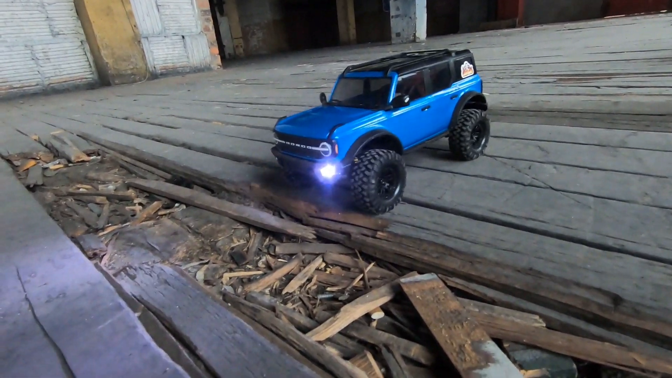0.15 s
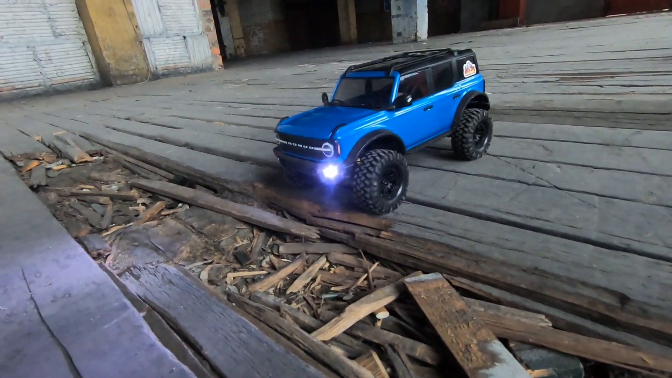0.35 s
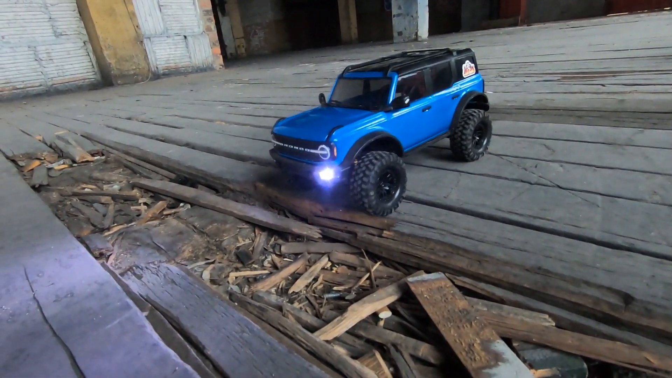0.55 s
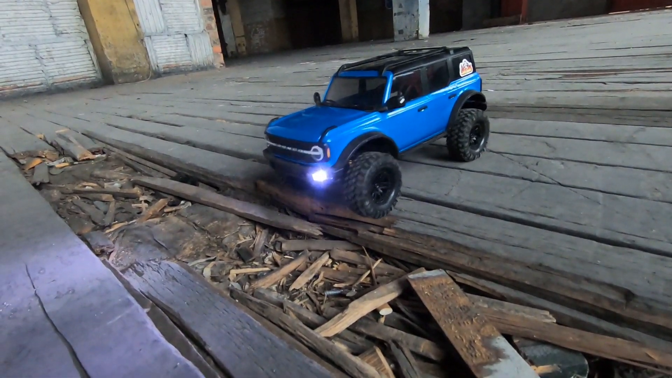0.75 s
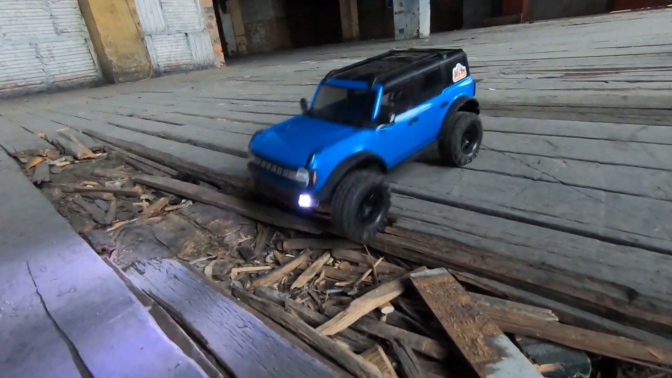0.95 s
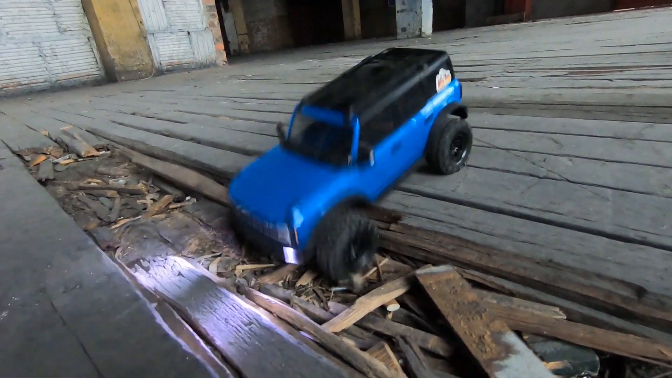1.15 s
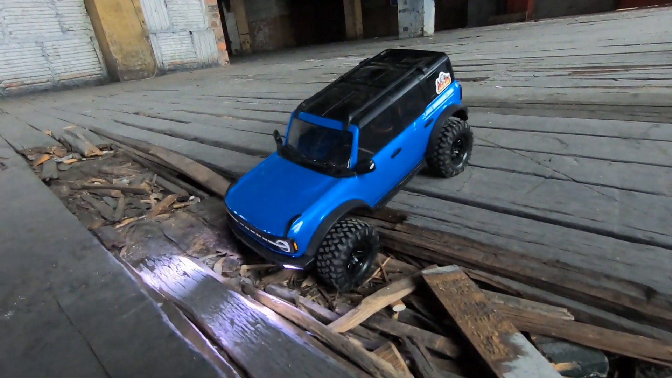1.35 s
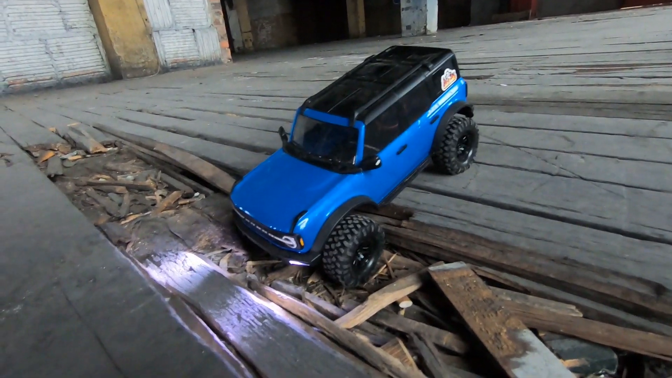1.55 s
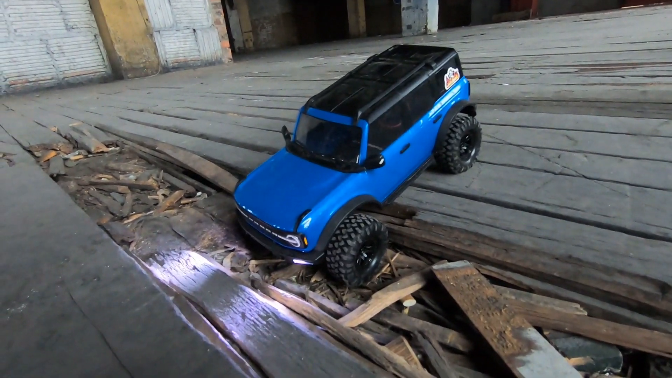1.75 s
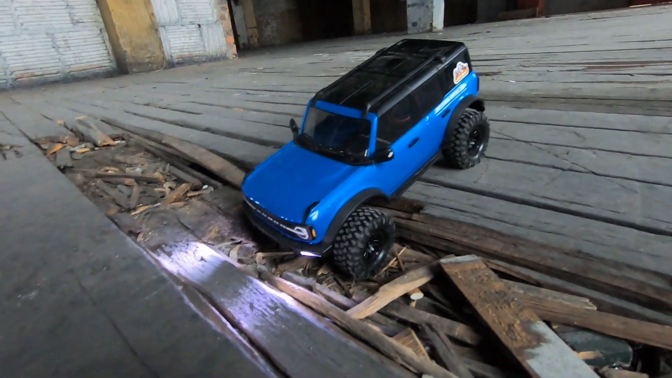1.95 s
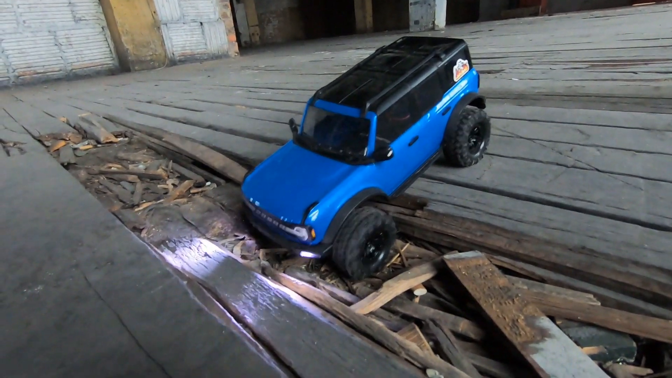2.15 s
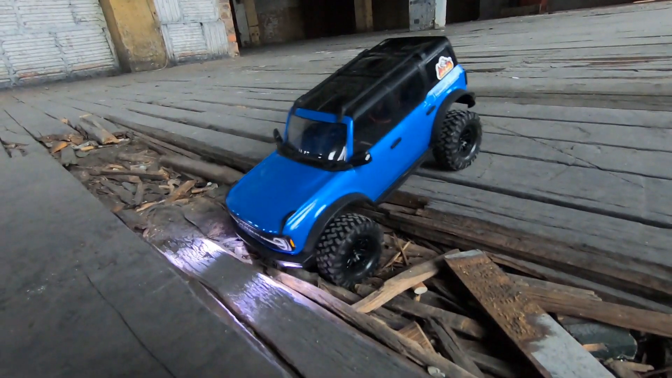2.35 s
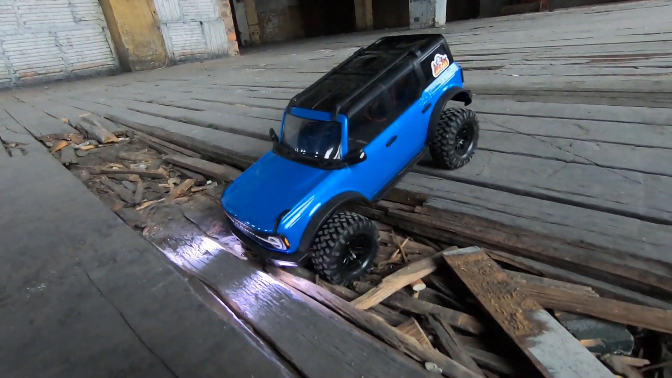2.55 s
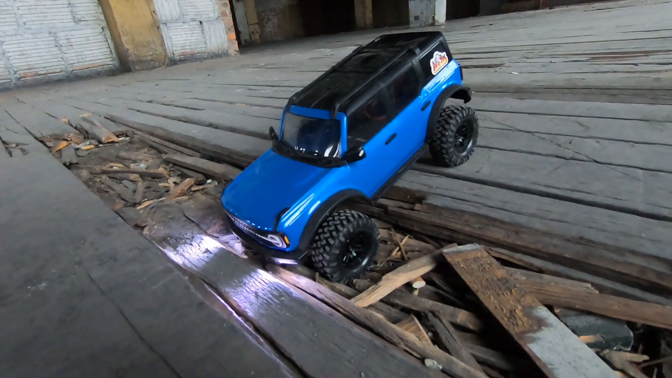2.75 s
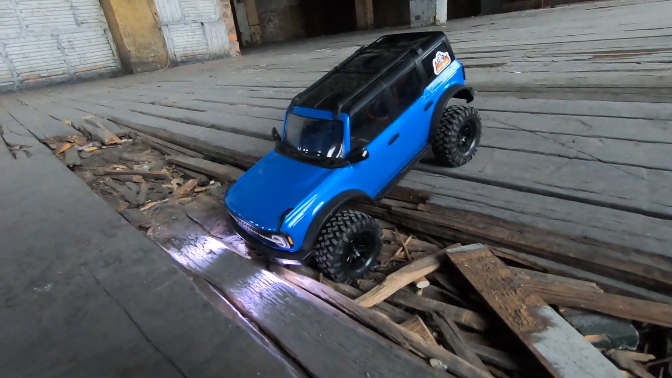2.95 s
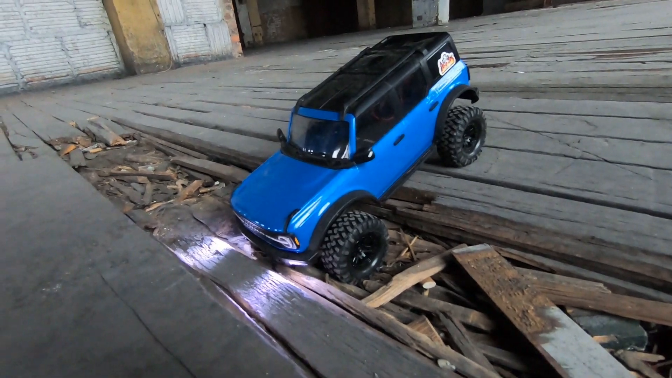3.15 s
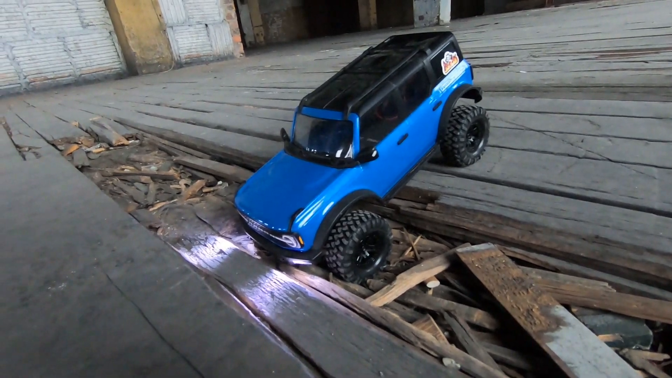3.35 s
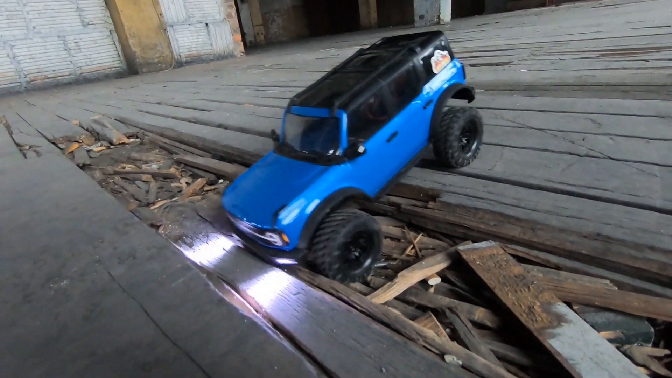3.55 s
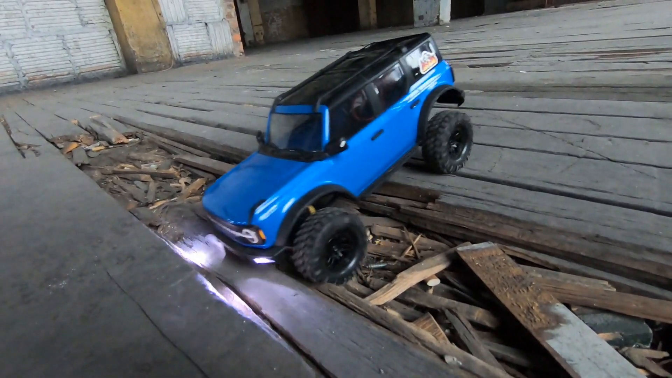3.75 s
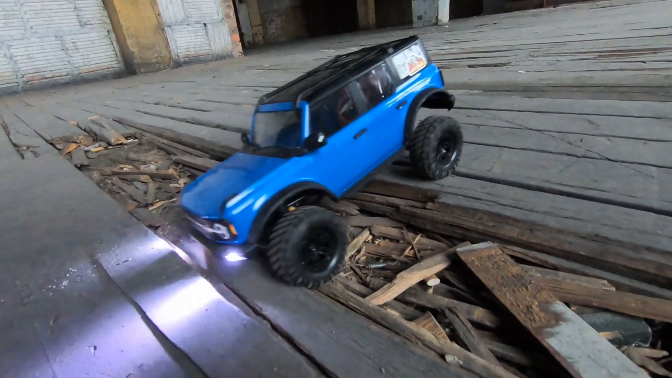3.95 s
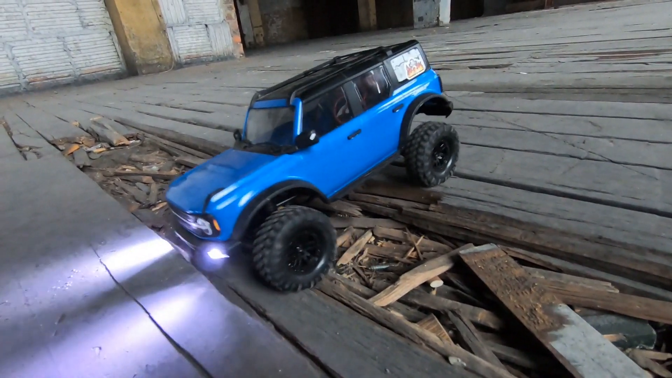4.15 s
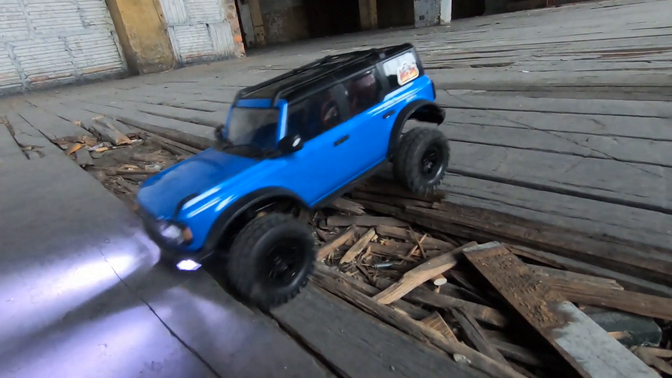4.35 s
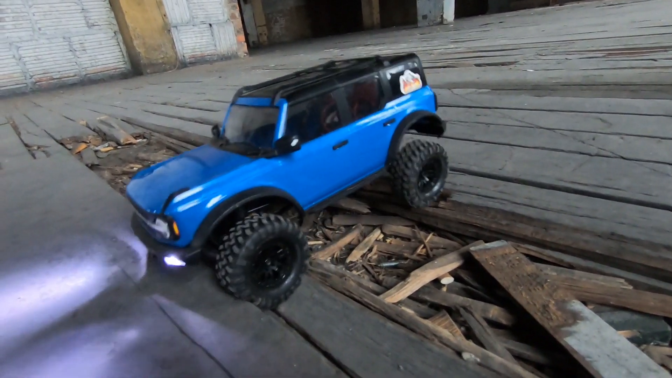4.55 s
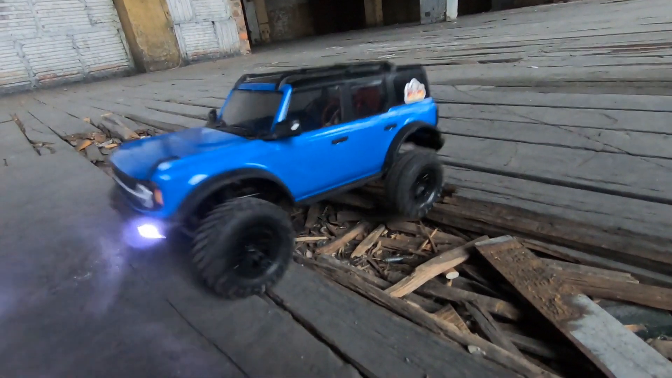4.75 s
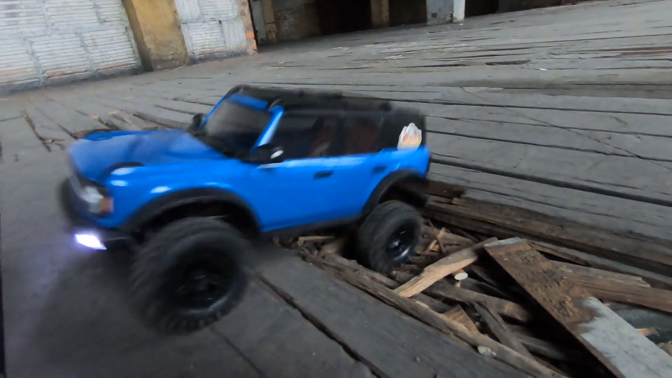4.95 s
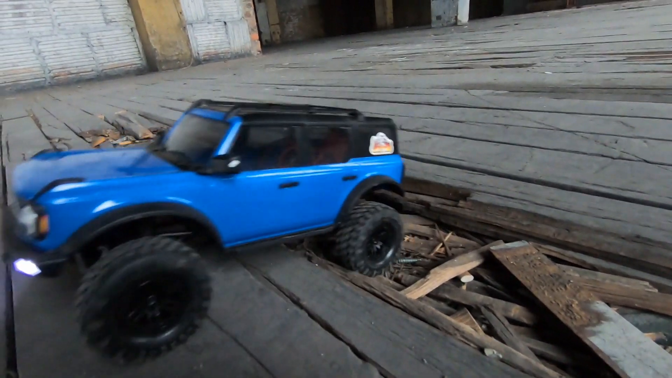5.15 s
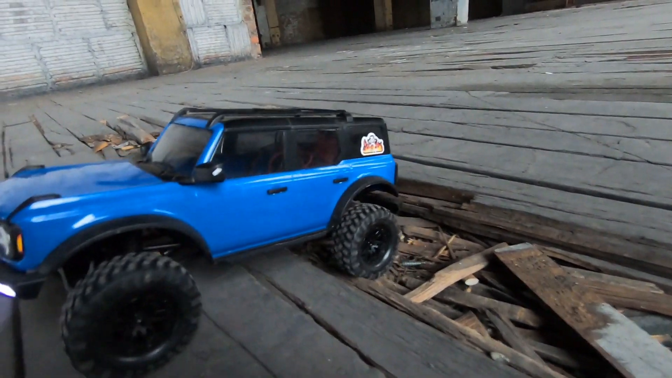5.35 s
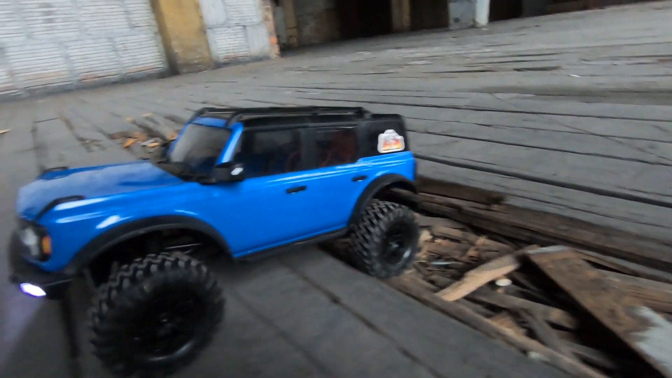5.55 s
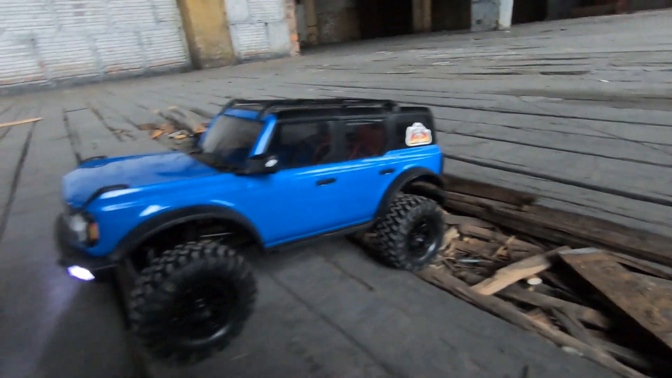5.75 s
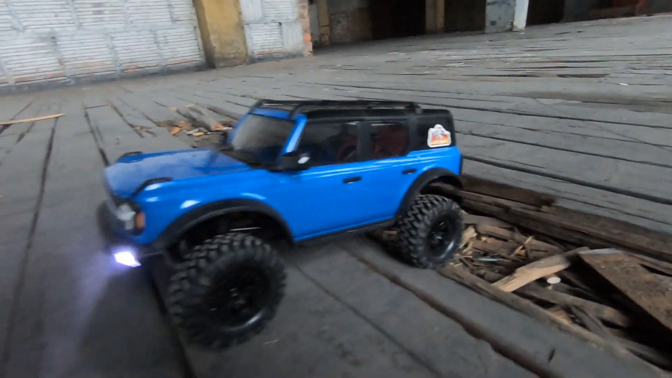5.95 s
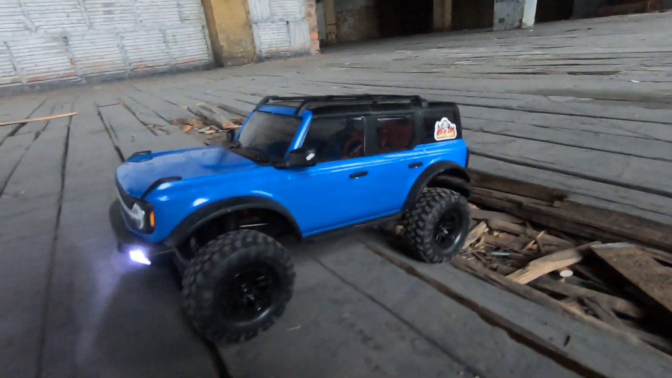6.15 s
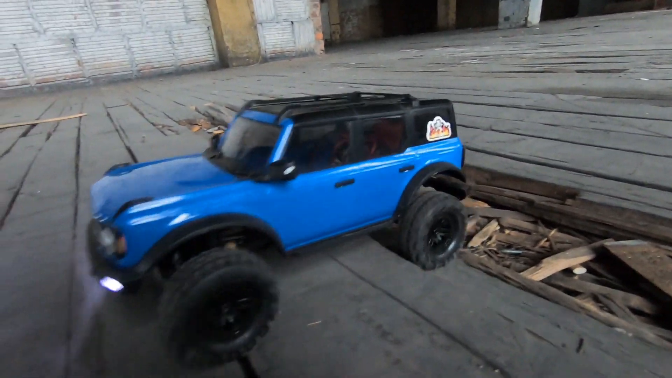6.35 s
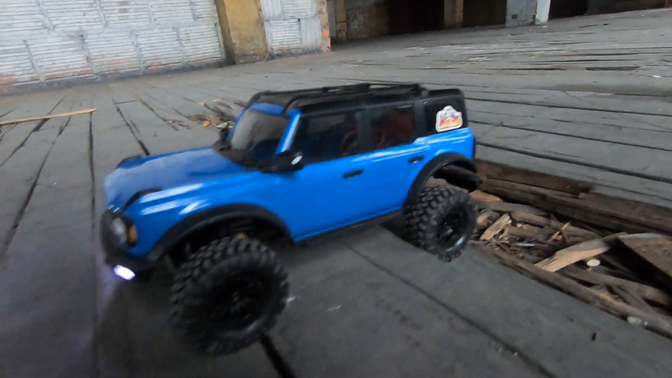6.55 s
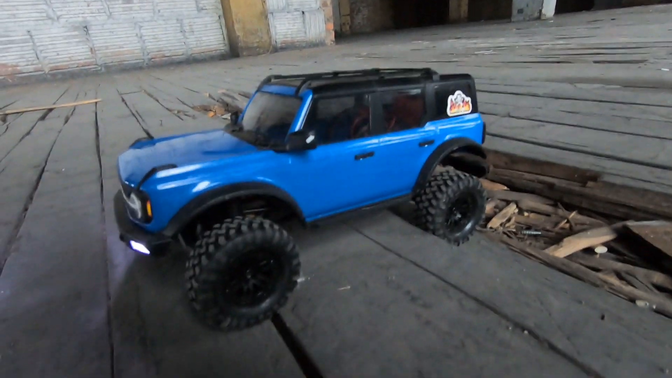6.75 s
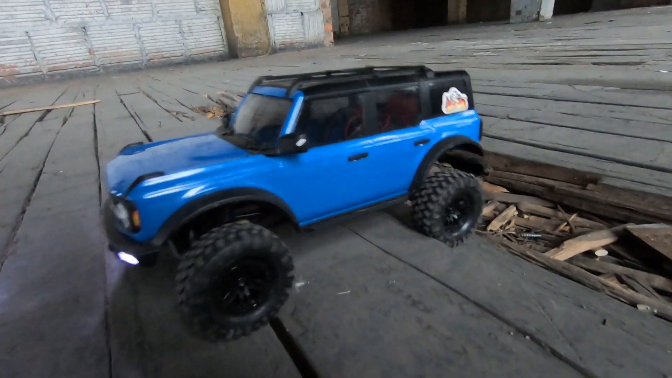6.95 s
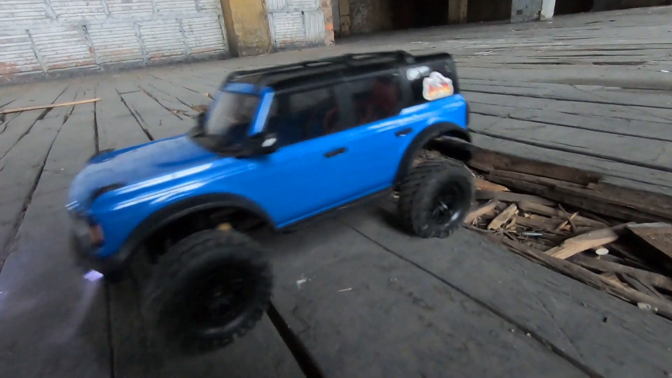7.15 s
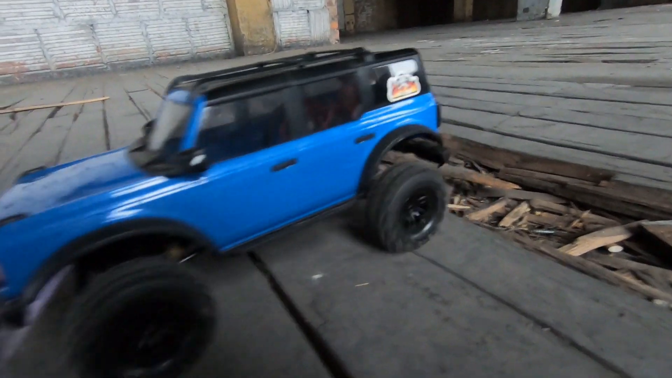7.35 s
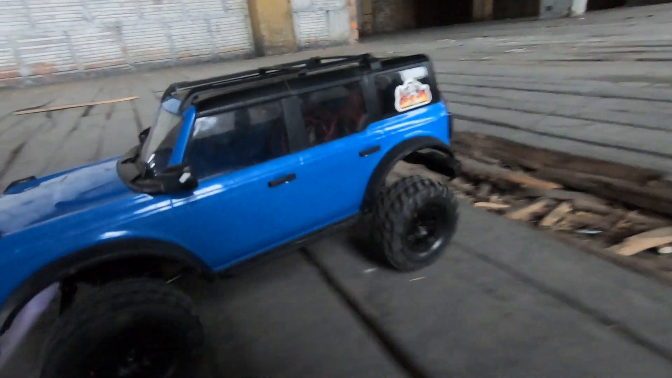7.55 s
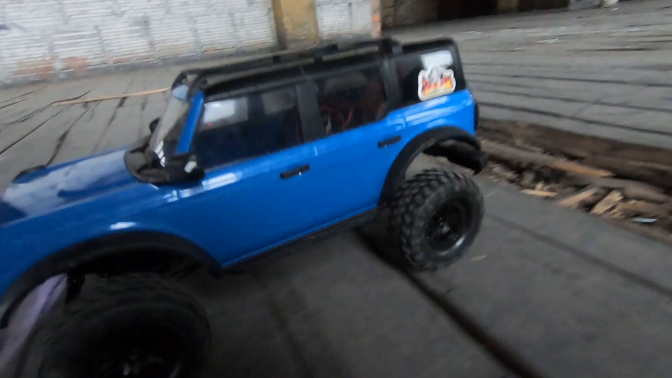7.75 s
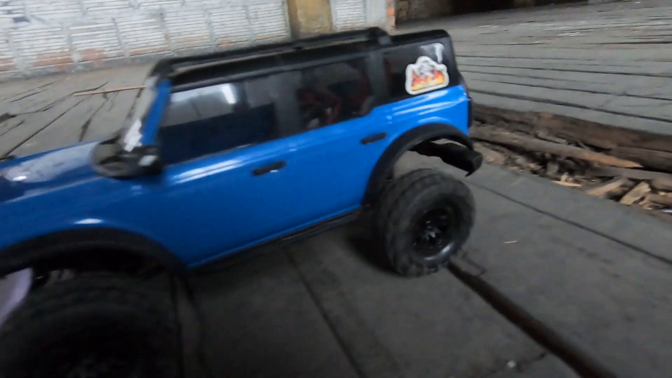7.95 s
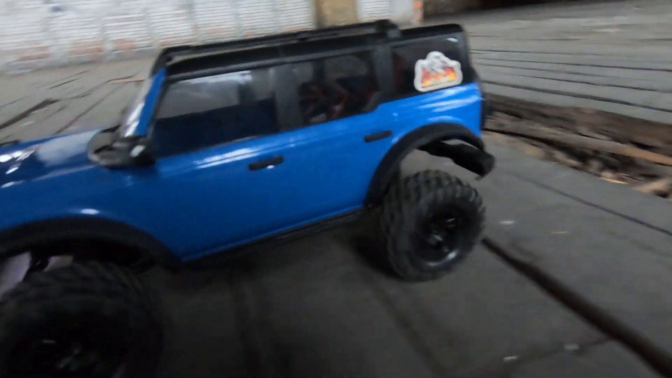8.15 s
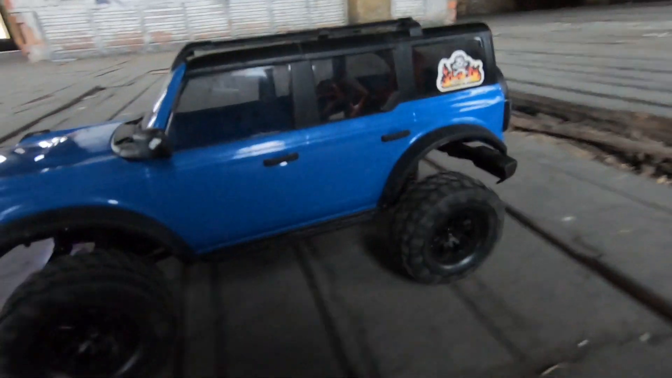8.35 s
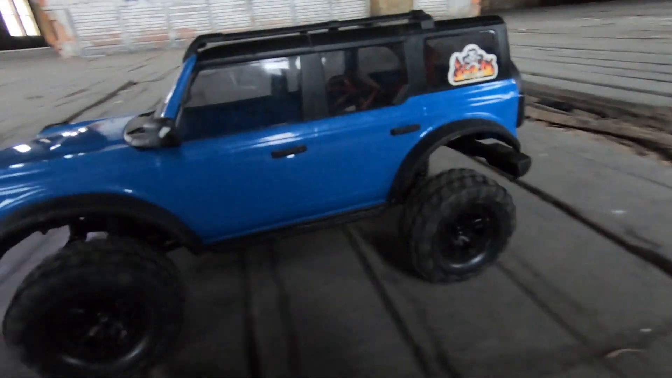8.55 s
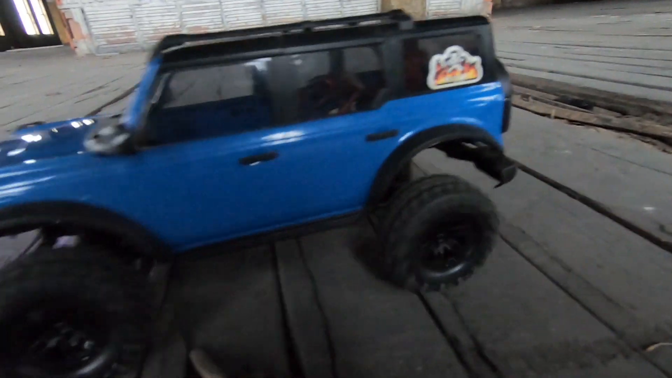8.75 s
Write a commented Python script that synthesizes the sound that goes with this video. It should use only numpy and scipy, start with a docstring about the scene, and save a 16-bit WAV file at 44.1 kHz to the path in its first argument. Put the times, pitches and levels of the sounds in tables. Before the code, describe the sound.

A small electric toy truck works over broken floorboards, heard close in an empty old building with soft air, hollow hum, deep rumble and faint echoes. From 0 s a thin high whine flutters over faint gear rasp, slowing, then quickening; at 1.2-1.4 s dry sticks crack and the plastic shell ticks and knocks. The motor stalls, faintly singing. A short nudge at 2.1-2.7 s brings one sharp plastic knock at 2.5, then a steady stalled tone until 3.5. It climbs with growing whine, small bumps and scrubbing, surging at 4.6 and 5.0; at 5.0-5.25 the loudest cluster of board thuds and shell clatter lands, leaving a faint springy ring. It creeps with light scrapes and a bump at 6.6, stalls with a fading whine, then from 7 s drives off, brighter and louder, rasping and buzzing with hollow gear knocks and small metallic chinks to the end, near 9 s.

```python
"""Toy truck on broken floorboards

A small electric toy truck crawls over broken floorboards in an empty old building.
Its motor sings at the 2 kHz switching rate of the speed controller and flutters as the rotor turns.
Gears rasp as shaped noise, tyres bump on ringing boards, and noise bursts ring the clattering plastic shell.
Loose sticks crack, small parts chink, and soft echoes, air, hum and a deep rumble lie behind."""
import sys
import numpy as np
from scipy import signal
from scipy.io import wavfile

SR = 44100
rng = np.random.default_rng(int(sys.argv[2]) if len(sys.argv) > 2 else 0)


def digitize_waveform(pressure):
    """Quantize a signal to 16-bit integers and store it at the path in sys.argv[1].

    Rows of a 2-D input are taken as channels; values are limited to [-1, 1].
    """
    field = np.atleast_2d(pressure).T
    bounded = np.clip(field, -1, 1)
    quanta = np.round(bounded * 32767).astype(np.int16)
    wavfile.write(sys.argv[1], SR, quanta)


N = 388080
TIME = np.arange(N) / SR
CRUISE_TURNS_PER_S, CREEP_TURNS_PER_S = 60, 24

# motor speed in the five pushes of the throttle: (start_s, turns_per_s)
ROLL_IN = [(0, 54), (.16, 62), (.28, 21), (.5, 14), (.8, 22), (.95, 39), (1.12, 47), (1.24, 66), (1.48, 0)]
NUDGE = [(2.13, 0), (2.25, 40), (2.31, 52), (2.43, 41), (2.5, 50), (2.74, 0)]
CLIMB = [(3.52, 0), (3.57, 48), (3.7, 60), (3.83, 63), (3.92, 48), (4.07, 57), (4.17, 40), (4.41, 47),
         (4.59, 104), (4.67, 24), (4.85, 52), (4.96, 124), (5.1, 135), (5.2, 84), (5.37, 32), (5.5, 29),
         (5.62, 37), (5.74, 41), (5.83, 35), (5.92, 16), (6, 14), (6.1, 14)]
CREEP = [(6.1, 14), (6.19, 27), (6.3, 42), (6.4, 52), (6.53, 84), (6.6, 58), (6.68, 0)]
DRIVE_OFF = [(6.95, 0), (7, 31), (7.21, 33), (7.32, 80), (7.5, 142), (7.62, 112), (7.8, 90), (8.1, 100),
             (8.3, 88), (8.8, 72)]
# the five runs, with relative levels at cruising speed:
# (speed_curve, rasp_db, drone_db, growth_db per tenfold speed)
RUNS = [(ROLL_IN, -56.5, -54.5, 33), (NUDGE, -53.5, -50, 41), (CLIMB, -55.5, -58.5, 24),
        (CREEP, -58.5, -67, 17), (DRIVE_OFF, -53, -60.5, 30.6)]
# tyres scrub and crunch over splinters: (peak_s, rise_s, fall_s, level_db)
SCRUBS = [(1.315, 0.17, 0.056, -51.5), (2.35, 0.031, 0.15, -52), (3.78, 0.072, 0.053, -53.5),
          (4.068, 0.028, 0.36, -59.5), (4.58, 0.024, 0.017, -44.5), (5.02, 0.055, 0.055, -35.5),
          (6.12, 0.039, 0.023, -43), (6.54, 0.035, 0.055, -43.5), (7.591, 0.047, 0.037, -44),
          (8.09, 0.054, 0.026, -43.5)]
# body panels buzz up under full drive: (peak_s, half_length_s, level_db)
GROWLS = [(7.676, 0.15, -43), (8.064, 0.11, -43.5), (8.45, 0.25, -45.5)]
SCRUB_DRONE_DB = -5.5      # how much a scrub shakes the panels


def drive():
    """Motor speed, and the strength of drone and rasp: both grow with speed and surge where a tyre scrubs."""
    turns, drone, rasp = np.zeros((3, N))
    for curve, rasp_db, drone_db, growth_db in RUNS:
        speed = np.interp(TIME, *np.transpose(curve), left=0, right=0).clip(0)
        effort = (speed / CRUISE_TURNS_PER_S) ** (growth_db / 20)
        turns += speed
        rasp += from_db(rasp_db) * effort
        drone += from_db(drone_db) * effort
    scrub = sum(from_db(db) * swell(s, rise_s, fall_s) for s, rise_s, fall_s, db in SCRUBS)
    splinters = grit(per_s=170, size_db=3, length_s=.002)
    scrub = scrub * np.sqrt((1 + splinters ** 2) / 2)
    growl = sum(from_db(db) * swell(s, half_s, half_s) for s, half_s, db in GROWLS)
    drone = np.hypot(drone, growl + from_db(SCRUB_DRONE_DB) * scrub)
    return turns, drone, np.hypot(rasp, scrub)


# how near the motor sounds, heard in the upper harmonics: (start_s, level_db)
NEARNESS = [(0, -6), (.9, -33), (2.3, -6), (3.7, -20), (4.6, -18), (6.3, 0), (7.1, -7), (8.8, 23)]
# the switching tone and its lines one rotor rate above and below: (start_s, centre_db, above_db, below_db)
WHINE = [(.1, -69, -59, -67), (.5, -97, -70.5, -58.5), (1.15, -69, -58, -66), (2.35, -57.5, -57, -95),
         (3.8, -58.5, -52, -71), (4.25, -65, -50.5, -58), (4.75, -63, -48, -51), (5.6, -51, -47, -49.5),
         (6.3, -53.5, -48.5, -53), (7.1, -59, -49, -45.5), (7.5, -48.5, -47, -52.5), (8, -45.5, -46, -62),
         (8.7, -44.5, -44, -60)]
# the whine's octave while the motor runs: (start_s, level_db)
OCTAVE = [(0, -48.5), (.5, -54), (1.15, -51.5), (2.3, -58.5), (4.7, -61.5), (5.25, -48.5), (5.9, -63),
          (6.45, -49.5), (7.15, -56), (7.4, -49.5), (7.65, -52.5), (8.8, -47.5)]
# whine harmonics 3 to 7 while the motor runs: (level_db, nearness_share 0-1)
UPPER_WHINE = [(-65, .05), (-67, .27), (-78, .05), (-80, .2), (-80, .2)]
# stalled under load the motor sings on, coloured by where the rotor stopped:
# (start_s, end_s, sag_db_per_s, then level_db of harmonics 1, 2, 3, 4, 6, 7)
STALLS = [(1.426, 2.156, -7, -68.5, -63.5, -76, -72, -76.5, -85),
          (2.65, 3.028, 8, -67.5, -61, -66, -62, -94, -103.5),
          (3.033, 3.558, -1, -67, -56, -68.5, -64, -99, -98),
          (6.677, 6.95, 25, -50.5, -56.5, -54, -72, -80, -68)]
# how deeply the rotor ripples the octave, then the harmonics above it: (depth ratio, roughness ratio)
RIPPLE = [(.2, .1), (.6, .4)]
SWITCH_HZ, BRUSH_DB = 2000, -12.5


def whine(angle, turns, second_db=-14, skirt_db=-11, swing=0.079, port_angle=0.29):
    """Switched current makes the motor sing; the turning rotor swells and twists the tone, giving side lines."""
    near_db, = in_time(NEARNESS)
    octave_db, = in_time(OCTAVE)
    centre_db, above_db, below_db = in_time(WHINE)
    turning = np.clip(turns / CREEP_TURNS_PER_S, 0, 1)

    # stalls fade in and out over 50 ms, while the running tone gives way
    gates = [np.clip(np.minimum(TIME - start, end - TIME) * 20 + .5, 0, 1) for start, end, *_ in STALLS]
    running = 1 - sum(gates)
    stalls = []
    for gate, (start, end, sag, *_) in zip(gates, STALLS):
        from_middle_s = TIME.clip(start, end) - (start + end) / 2
        stalls.append(gate * from_db(-sag * from_middle_s))
    held = {}
    for column, k in enumerate((1, 2, 3, 4, 6, 7), 3):
        held[k] = sum(stall * from_db(row[column]) for stall, row in zip(stalls, STALLS))

    # complex signals: their angle turns the tone forward or back, making lines above or below it
    surge = from_db([above_db, below_db]) * running
    above, below = surge * turning
    flutter = np.hypot(above, below)
    chop, contact = commutation(angle), brushes(angle)
    sides = above * chop + below * chop.conj()
    sides += flutter * (from_db(second_db) * 2 * np.cos(2 * angle) + from_db(BRUSH_DB) * contact)
    sides += surge.sum(axis=0) * (1 - turning)      # at a creep the surges merge into a held tone

    switch = 2 * np.pi * SWITCH_HZ * TIME
    ports = np.exp(1j * port_angle * np.array([[1], [-1]]))      # the tone reaches the two sides out of step
    levels_db = [centre_db, octave_db] + [db + share * near_db for db, share in UPPER_WHINE]
    out = np.zeros((2, N))
    for k, level_db in enumerate(levels_db, 1):
        steady = running * from_db(level_db + .5 * drift(7.8))
        depth, rough = RIPPLE[int(k > 2)]
        ripple = sides if k == 1 else steady * turning * (depth * chop + rough * brushes(angle))
        tone = np.exp(1j * (k * switch + swing * drift(0.072)))
        out += np.real((steady + ripple + held.get(k, 0)) * tone * ports)
    # at speed the tone also frays into a narrow hiss
    smear = flutter * from_db(skirt_db) * turns / CRUISE_TURNS_PER_S
    return np.sqrt(2) * out + smear * narrow_noise(2210, 300)


def commutation(angle, sharpness=3.5, duty_edge=.25, lean=.3, uneven=.18):
    """One steep-fronted surge of current per turn of the angle; its strength varies over every three."""
    leaning = angle + lean * np.cos(angle)
    surge = np.tanh(sharpness * (np.cos(leaning) - duty_edge)) + 2 / np.pi * np.arcsin(duty_edge)
    return (surge + 1j * np.sin(angle)) * (1 + uneven * np.cos(angle / 3))


def brushes(angle, count=5):
    """Uneven brush contact: strength and phase take a few new values in every rotor turn."""
    contact = angle / (2 * np.pi) * count
    chance = rng.standard_normal((N // 20, 2)) @ [1, 1j]
    return rms_one(np.interp(contact, np.arange(len(chance)), chance))


# colour of the gear rasp: (pitch_hz, level_db per Hz)
RASP = [(100, -9), (250, 7.5), (450, 9.5), (700, -7), (1050, 0.5), (1450, 7), (2300, 4.5), (3200, 9.5),
        (4600, -2), (5700, -0.5), (7700, 1.5), (9500, -8.5), (13000, -13), (16000, -23)]
# body panels that the gears shake: (pitch_hz, width_hz, level_db)
PANELS = [(733.6, 85, 0.5), (768, 105, 3), (823.6, 44, -1)]


def gears(angle, drone_strength, rasp_strength, rasp_gain_db=1.0, drone_gain_db=-1, lumpy_db=2.0, ring_db=-9.0):
    """Teeth and grit click over a fine rasp that throbs with the rotor and shakes the body panels."""
    crunch = grit(per_s=320, size_db=2.8, length_s=.0012)
    force = np.sqrt(1.2 + crunch ** 2) * (1 + .22 * np.cos(angle) + .15 * drift(30))
    rasp = coloured(RASP, rng.standard_normal((2, 2, N)) * force, patchy_db=1.4)
    # play in the drive shafts makes small parts chink
    play = grit(per_s=90, size_db=2, length_s=.005)
    rasp += from_db(ring_db) * play * narrow_noise(5880, 1000)
    panels = sum(from_db(db) * narrow_noise(hz, width) for hz, width, db in PANELS)
    drone = rms_one(panels * from_db(lumpy_db * drift(50)))
    return from_db(rasp_gain_db) * rasp_strength * rasp + from_db(drone_gain_db) * drone_strength * drone


# chassis knocks and ticks, relative levels: (start_s, level_db, loudest pitch_hz, fall_db one octave away)
KNOCKS = [(.142, -49, 2700, 6), (1.0484, -46, 2600, 6), (1.2409, -29, 2740, 11), (1.258, -41.5, 4180, -3.5),
          (1.2712, -30.5, 8050, 0), (1.288, -31.5, 3460, 13), (1.32, -37.5, 7000, 0),
          (1.3627, -41.5, 2900, 3), (2.51, -18.5, 3600, 7.5), (2.5327, -30.5, 4630, 3),
          (3.7841, -42.5, 2200, 1), (3.813, -43, 3000, 9), (4.072, -33.5, 3330, 5.5), (5.006, -31, 3480, 0),
          (5.0113, -19, 1400, 3), (5.021, -26, 1790, 11), (5.051, -28.5, 1700, 9),
          (5.0777, -16.5, 1210, 1.2), (5.1398, -24, 1700, 1), (5.252, -26, 5000, 2),
          (5.866, -45, 4500, 2.5), (6.088, -38.5, 5600, 9), (6.1338, -36, 5200, 11),
          (6.431, -44, 3540, 1.7), (6.541, -35.5, 6500, 10), (7.04, -38, 1300, 1)]
# plastic shell resonances: (pitch_hz, width_hz, level_db)
SHELL = [(776, 240, 12.5), (1294, 160, 14.5), (1800, 670, 11.5), (2120, 230, 0), (2930, 970, 6.5),
         (4240, 930, 4.5), (5200, 520, -0.5), (7200, 1050, 3), (10000, 3100, -5)]
# how a blow reaches three low, three middle, two high and the top resonance: (centre_hz, contact_s, level_db)
REGISTERS = [(1400, 0.0019, 0), (3230, 0.0035, -4), (6500, 0.0014, -3.5), (11400, 0.0016, -9)]
# how alike left and right are in knocks: (pitch_hz, likeness 0-1)
KNOCK_LIKENESS = [(1400, 0.63), (3200, 0.88), (7400, 0.63)]


def knocks(rise_s=0.0011, gain_db=-15, rattle_db=-24, rattle_s=0.066):
    """Each blow is a brief chatter of loose plastic that rings the shell, with a faint rattle after it."""
    out, t = np.zeros((2, N)), TIME[:SR // 4]
    groups = [SHELL[:3], SHELL[3:6], SHELL[6:8], SHELL[8:]]
    for s, peak_db, bright_hz, fall_db in KNOCKS:
        for (centre_hz, contact_s, register_db), modes in zip(REGISTERS, groups):
            db = peak_db + register_db - fall_db * np.log2(centre_hz / bright_hz) ** 2
            rise = 1 - np.exp(-(t / rise_s) ** 2)
            fall = np.exp(-t / contact_s) + from_db(rattle_db) * np.exp(-t / rattle_s)
            chatter = rng.standard_normal((2, len(t))) * rise * fall
            ring = 0
            for k, (hz, width, level) in enumerate(modes):      # neighbours ring with opposite sign
                mode = resonate(resonate(chatter, hz, width), hz, hz)
                ring = ring + (-1) ** k * from_db(level) * mode
            pair = spread([rms_one(r) for r in ring], centre_hz, KNOCK_LIKENESS)
            add(out, s, from_db(db + gain_db) * rms_one(pair))
    return out


# tyres on boards, relative levels: (start_s, level_db, pitch_hz)
BUMPS = [(1.247, -32, 325), (1.273, -31.5, 470), (1.293, -28, 530), (1.324, -29, 178), (2.51, -29.5, 203),
         (2.532, -37, 302), (3.594, -41, 503), (3.682, -35, 540), (3.723, -39.5, 560), (3.812, -38, 554),
         (3.925, -36.5, 408), (4.558, -33.5, 610), (5.013, -18, 249), (5.034, -20, 162), (5.05, -20.5, 730),
         (5.08, -16, 284), (5.101, -20, 242), (5.11, -18, 134), (5.121, -19.5, 540), (5.17, -27, 334),
         (5.25, -28, 570), (6.104, -37, 630), (6.129, -36, 386), (6.593, -27.5, 277)]
# the floor gives under the hardest landings: (start_s, level_db)
LANDINGS = [(5.014, -27.5), (5.082, -30)]
# floorboard resonances; t60 is the time to fall 60 dB: (pitch_hz, level_db, t60_s)
BOARD = [(93, -5, 0.31), (132.8, 0, .26), (269.6, -6, 0.41), (318, -6.5, .25), (348.8, -4.5, 0.32),
         (408.5, -9.5, 0.43), (496, -10, 0.14)]


def bumps(thud_s=0.021, damping=0.48, thud_db=-16, board_db=-14):
    """Rubber tyres thud on the boards, which ring briefly; hard landings also move the whole floor."""
    out, blows, landings, t = np.zeros(N), np.zeros(N), np.zeros(N), TIME[:SR // 8]
    for s, db, hz in BUMPS:
        push = rng.standard_normal(len(t)) * np.exp(-t / thud_s)
        thud = resonate(resonate(push, hz, damping * hz), hz, hz)
        add(out, s, from_db(db + thud_db) * rms_one(thud))
        add(blows, s, from_db([db + board_db]))
    for s, db in LANDINGS:
        add(landings, s, from_db([db]))
    for hz, db, t60 in BOARD:
        r, w = from_db(-60 / (t60 * SR)), 2 * np.pi * hz / SR
        # ordinary bumps move the low resonances less
        strikes = (landings + blows * min(hz / 300, 1) ** 2) * rng.choice([-1, 1], N)
        out += from_db(db) * signal.lfilter([0, np.sin(w)], [1, -2 * r * np.cos(w), r * r], strikes + 1e-18)
    return out


# gear backlash knocks: (start_s, peak level_db)
CLUNKS = [(.144, -56), (.96, -46), (1.101, -39), (1.213, -38.5), (7.454, -39), (7.545, -35), (7.59, -37),
          (7.647, -33.5), (7.676, -33), (7.724, -36), (7.827, -35.5), (7.885, -32.5), (7.96, -36),
          (8.043, -30.5), (8.067, -30.5), (8.104, -35), (8.201, -30.5), (8.374, -33.5), (8.422, -33),
          (8.781, -36)]


def clunks(panel_hz=780, swell_s=0.005):
    """Gear backlash knocks a hollow panel: a few cycles swell and die, at a slightly new pitch each time."""
    out, t = np.zeros(N), TIME[:SR // 10]
    for s, db in CLUNKS:
        hz = panel_hz * (1 + 0.028 * rng.standard_normal())
        shape = t / swell_s * np.exp(1 - t / swell_s)
        add(out, s, from_db(db) * shape * np.sin(2 * np.pi * hz * t))
    return out


# loose sticks; the crack is relative to the ring: (start_s, level_db, pitch_hz, ring_s, crack_db)
STICKS = [(1.2295, -27, 840, 0.0048, -18), (1.2413, -13.5, 3150, 0.0017, -15),
          (1.2582, -28, 4400, 0.0016, 5), (1.2732, -20.5, 800, 0.0028, -4), (1.2908, -20, 820, 0.0038, -11),
          (1.3631, -24.5, 3340, 0.0023, -9)]


def sticks(crack_s=0.00053):
    """Loose dry sticks crack against each other under the front wheels, each at its own pitch."""
    out = np.zeros(N)
    for s, db, hz, ring_s, crack_db in STICKS:
        add(out, s, from_db(db) * tap(hz, ring_s, crack_db, crack_s))
    return out


# a drive shaft chinks: (start_s, level_db)
CHINKS = [(7.561, -29), (7.586, -29.5), (7.606, -31), (7.828, -36), (7.848, -35), (7.945, -36),
          (8.044, -37), (8.109, -34)]


def chinks(ring_hz=5550, ring_s=0.0035, crack_db=-3, crack_s=.002):
    """A loose shaft snaps across its play and rings briefly."""
    out = np.zeros(N)
    for s, db in CHINKS:
        hz = ring_hz * (1 + 0.011 * rng.standard_normal())
        add(out, s, from_db(db) * tap(hz, ring_s, crack_db, crack_s))
    return out


def tap(hz, ring_s, crack_db, crack_s):
    """A small hard thing is struck: a sharp crack and a short ring of height 1."""
    t = TIME[:SR // 10]
    crack = from_db(crack_db) * rng.standard_normal(len(t)) * np.exp(-t / crack_s)
    return crack + np.sin(2 * np.pi * hz * t) * np.exp(-t / ring_s)


# the steering servo buzzes: (middle_s, half_length_s, fizz_db, panel_db)
STEERING = [(0.322, 0.025, -59, -70), (1.755, 0.078, -70, -65), (5.552, 0.092, -57, -65),
            (6.77, 0.035, -55, -69)]


def servo(buzz_hz=5600, width_hz=1700, panel_hz=852, panel_width_hz=60, idle_db=-79):
    """The steering servo's small gears fizz and stir a body panel, faintly even while it only holds the wheels."""
    fizz = sum(from_db(db) * swell(s, half_s, half_s) for s, half_s, db, _ in STEERING)
    shake = sum(from_db(db) * swell(s, half_s, half_s) for s, half_s, _, db in STEERING)
    panel = (shake + from_db(idle_db)) * narrow_noise(panel_hz, panel_width_hz)
    return fizz * narrow_noise(buzz_hz, width_hz) + panel


# shock springs ring on after a hard landing: (start_s, level_db)
TWANGS = [(5.079, -46)]
# spring resonances: pitch_hz
COILS = [1019, 1347, 1436, 1500, 1830]


def springs(blur_db=6, blur_hz=1420, width_hz=620, t60=1.5):
    """A few clear coil resonances, over a blur of weaker ones, die away slowly."""
    out, t = np.zeros((2, N)), TIME[:2 * SR]
    blur = narrow_noise(blur_hz, width_hz)[:, :len(t)] * from_db(blur_db)
    for s, db in TWANGS:
        ring = sum(np.sin(2 * np.pi * (hz * t + rng.random())) for hz in COILS)
        add(out, s, from_db(db) * (ring + blur) * np.exp(-np.log(1000) * t / t60))
    return out


def hall(x, t60=0.92, wall_hz=6000):
    """The building echoes: eight feedback delays a side, duller on every round."""
    out, dull = np.zeros((2, N)), np.exp(-2 * np.pi * wall_hz / SR)
    for k, lag in enumerate((rng.uniform(0.017, .055, 16) * SR).astype(int)):
        loop, gain, state = x[k % 2].copy(), from_db(-60 * lag / SR / t60), [0.]
        for i in range(lag, N, lag):
            back, state = signal.lfilter([gain * (1 - dull)], [1, -dull], loop[i - lag:i], zi=state)
            loop[i:i + lag] += back[:N - i]
        out[k % 2] += (loop - x[k % 2]) * (-1) ** (k // 2)      # echoes only, without the direct sound
    return out


def close_pair(pair, apart_hz=450):
    """Two listening points sit close together, so they hear the long waves of the echoes alike."""
    high_pass = signal.butter(2, apart_hz, "high", fs=SR, output="sos")
    side = signal.sosfilt(high_pass, (pair[0] - pair[1]) / 2)
    return pair.mean(axis=0) + np.array([side, -side])


# colour of the quiet air: (pitch_hz, level_db per Hz)
AIR = [(20, -20), (90, 2.5), (250, -4), (350, -9.5), (550, -8.5), (1500, -16.5), (3500, -23), (7000, -18.5),
       (15000, -34.5)]
AIR_DB = -64


def air():
    """Soft steady noise of the empty building."""
    return from_db(AIR_DB) * coloured(AIR, rng.standard_normal((2, 2, N)))


# deep rumble: (start_s, level_db)
RUMBLE = [(0, -66), (5.9, -64), (7.3, -56.5), (8.8, -77)]


def rumble():
    """Very low noise around 25 Hz that slowly changes level."""
    rumble_db, = in_time(RUMBLE)
    return from_db(rumble_db) * narrow_noise(25, 49)


# the building's hollow background drone: (pitch_hz, width_hz, level_db)
HUM = [(157.8, 50, -56), (222.6, 27.6, -63), (298.3, 54, -72)]


def hum():
    """Noise in three narrow bands makes a hollow drone."""
    return sum(from_db(db) * narrow_noise(hz, width) for hz, width, db in HUM)


def from_db(db):
    """Decibels to gain."""
    return 10 ** (np.asarray(db) / 20)


def rms_one(x):
    """Scale to unit power."""
    return x / np.sqrt(np.mean(x ** 2) + 1e-20)


def in_time(rows):
    """Each column of a curve at every sample."""
    s, *columns = np.transpose(rows)
    return [np.interp(TIME, s, c) for c in columns]


def at_hz(points, hz):
    """Read a spectrum on a log-frequency axis."""
    pitch_hz, value = np.transpose(points)
    return np.interp(np.log(hz), np.log(pitch_hz), value)


def drift(rate):
    """Slow chance with spread 1, made at a twentieth of the sample rate; rate in Hz."""
    r = np.exp(-40 * np.pi * rate / SR)
    chance = rng.standard_normal(N // 20 + 4002)
    slow = signal.lfilter([1], [1, -2 * r, r * r], chance)[4000:]      # skip the filter's start
    return np.interp(np.arange(N) / 20, np.arange(len(slow)), rms_one(slow))


def swell(s, rise_s, fall_s):
    """A rounded rise to 1 at a time, then a fall."""
    steps = np.linspace(-5, 5, 101)
    return np.interp(TIME, s + steps * np.where(steps < 0, rise_s, fall_s), np.exp(-steps ** 2 / 2))


def grit(per_s, size_db, length_s):
    """Random brief surges of force, a few much larger than the rest; rms 1."""
    sizes = from_db(size_db * np.minimum(rng.exponential(1, N), 3))
    clicks = (rng.random(N) < per_s / SR) * sizes
    return rms_one(signal.lfilter([1], [1, -np.exp(-1 / (length_s * SR))], clicks + 1e-18))


def resonate(x, hz, width):
    """A resonance with gain 1 on top."""
    r = np.exp(-np.pi * width / SR)
    feedback = [1, -2 * r * np.cos(2 * np.pi * hz / SR), r * r]
    return signal.lfilter(np.array([1, 0, -1]) * (1 - r * r) / 2, feedback, x)


# how alike left and right are in running noise: (pitch_hz, likeness 0-1)
LIKENESS = [(30, 0.94), (250, 0.54), (700, 0.22), (2000, 0.67), (7000, 0.87), (14000, 1)]


def spread(pair, hz, likeness=LIKENESS):
    """Mix two unrelated signals into left and right, as alike as the pitch allows."""
    alike = np.clip(at_hz(likeness, hz), 0, .995)
    mid, side = np.sqrt((1 + alike) / 2) * pair[0], np.sqrt((1 - alike) / 2) * pair[1]
    return np.array([mid + side, mid - side])


def coloured(spectrum, sources, patchy_db=0, patches_per_s=35):
    """Half-octave stereo bands, dealt in turn from two noise pairs, each with its own flicker if patchy; rms 1."""
    out, edges = 0, np.geomspace(18, 17000, 21)
    for k, (low, high) in enumerate(zip(edges, edges[1:])):
        band_pass = signal.butter(2, [low, high], "band", fs=SR, output="sos")
        band = signal.sosfilt(band_pass, sources[k % 2])
        hz = np.sqrt(low * high)
        level_db = at_hz(spectrum, hz) + patchy_db * drift(patches_per_s)
        out = out + from_db(level_db) * spread(band, hz)
    return rms_one(out)


def narrow_noise(hz, width):
    """Random shaking of one steep stereo resonance; rms 1."""
    shaken = resonate(resonate(rng.standard_normal((2, N)), hz, width), hz, width)
    return rms_one(spread(shaken, hz))


def add(track, s, sound):
    """Lay a sound into a track at a time."""
    start = max(round(s * SR), 0)
    track[..., start:start + sound.shape[-1]] += sound[..., :N - start]


# truck's place: (start_s, left_minus_right_db)
PAN = [(0, -.3), (2.6, .5), (3.7, -1), (7.2, 1.6)]
SPEED_WOBBLE = .03      # share of the motor speed


def scene(wet_db=-24, thud_wet_db=-25):
    """The truck in its place, the building's echoes and its quiet background."""
    turns, drone, rasp = drive()
    pan_db, = in_time(PAN)
    angle = 2 * np.pi * np.cumsum(turns * (1 + SPEED_WOBBLE * drift(12.76))) / SR
    clatter = gears(angle, drone, rasp) + knocks() + clunks() + sticks() + chinks() + servo()
    thuds = bumps()
    truck = whine(angle, turns) + clatter + thuds + springs()
    truck = truck * from_db(pan_db / 2 * np.array([[1], [-1]]))
    echoes = close_pair(hall(from_db(wet_db) * clatter + from_db(thud_wet_db) * thuds))
    return truck + echoes + air() + rumble() + hum()


CUTOFF_HZ = 15300


def record(dry):
    """The top is cut steeply."""
    low_pass = signal.ellip(10, .1, 80, CUTOFF_HZ, fs=SR, output="sos")
    return signal.sosfilt(low_pass, dry)


dry = scene()
out = record(dry)
digitize_waveform(out)
```